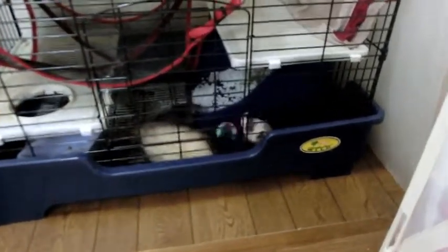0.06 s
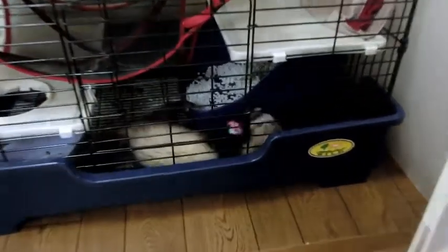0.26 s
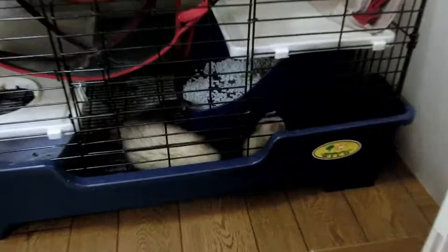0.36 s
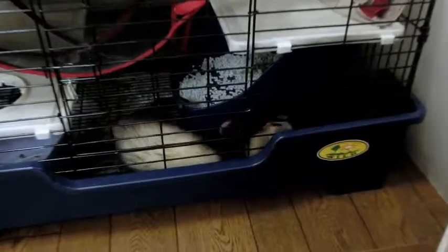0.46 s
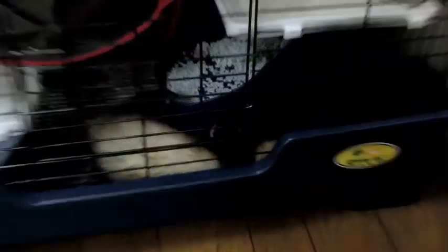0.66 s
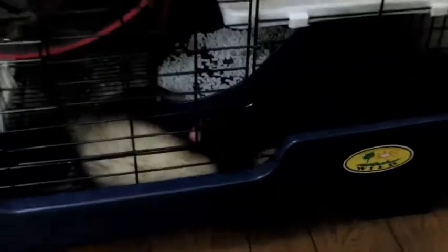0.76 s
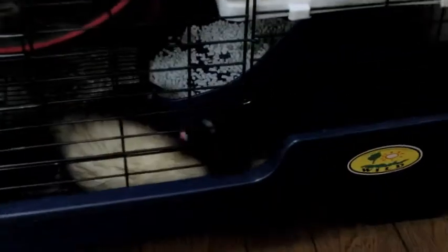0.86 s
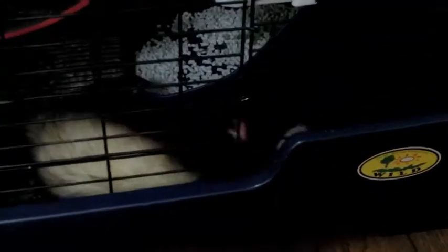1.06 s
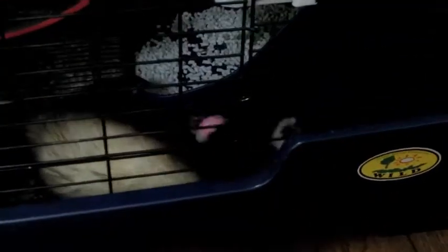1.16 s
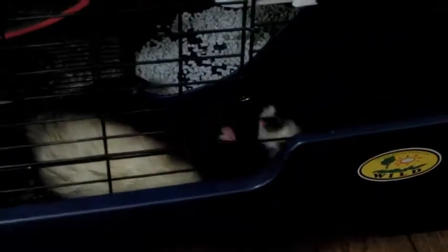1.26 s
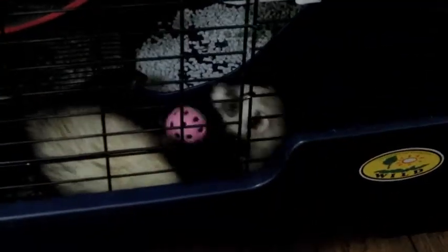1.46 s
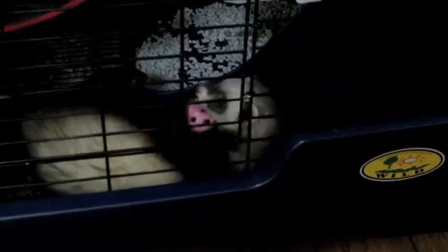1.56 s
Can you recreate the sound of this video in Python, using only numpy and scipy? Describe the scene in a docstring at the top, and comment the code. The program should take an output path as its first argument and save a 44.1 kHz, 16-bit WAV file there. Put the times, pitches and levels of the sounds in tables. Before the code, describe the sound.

A small bell jingles as a ferret shoves a ball around its cage, with one sharp knock.

```python
"""A small metal bell jingles on the right: a ferret shoves a ball about in a wire cage indoors.
The pellet inside strikes and rolls, ringing the bell; shell and paws scuff the plastic tray.
One sharp, dry knock right by the microphone overloads it.
The room is quiet, with a faint throbbing hum."""
import sys
import numpy as np
from scipy import signal
from scipy.fft import rfft, irfft, next_fast_len
from scipy.io import wavfile

SR = 44100
rng = np.random.default_rng(int(sys.argv[2]) if len(sys.argv) > 2 else 0)


def dump(signal):
    """Clip the signal to [-1, 1] and save it as 16-bit WAV at the path in sys.argv[1]."""
    limited = np.clip(np.atleast_2d(signal).T, -1, 1)
    pcm = np.round(limited * 32767).astype(np.int16)
    wavfile.write(sys.argv[1], SR, pcm)


N = 70560

# pellet strikes (time [s], level [dB])
STRIKES = [(.002, -28), (0.029, -32), (0.084, -40.5), (.115, -23), (0.132, -36), (.157, -35), (.207, -30.5),
           (0.215, -34.5), (.232, -22), (.252, -33.5), (.312, -33.5), (.321, -23.5), (.333, -35),
           (.403, -24.5), (0.436, -26.5), (0.495, -38.5), (.559, -25), (.566, -27.5), (0.614, -29.5),
           (.622, -25), (0.73, -31.5), (.919, -44), (.942, -44.5), (.988, -40.5), (.998, -37.5),
           (1.065, -30), (1.093, -34.5), (1.106, -30.5), (1.133, -38), (1.166, -38), (1.181, -36),
           (1.215, -30.5), (1.222, -27), (1.247, -39), (1.32, -39), (1.384, -34.5), (1.427, -38),
           (1.435, -36), (1.445, -38.5), (1.458, -33.5), (1.525, -33), (1.566, -33), (1.576, -35.5)]
# pellet rolling (time [s], level [dB])
ROLLING = [(0, -37), (.07, -42.5), (.3, -42), (.44, -39.5), (.6, -40), (.69, -41), (.77, -87.5),
           (.9, -60.5), (.97, -60.5), (1.01, -43), (1.055, -66.5), (1.087, -46), (1.115, -41.5), (1.2, -55),
           (1.25, -43), (1.35, -47.5), (1.415, -55.5), (1.455, -45), (1.515, -49), (1.6, -59)]
# bell modes (frequency [Hz], gain [dB])
BELL_MODES = [(7010, -2.5), (7590, 5), (7680, 4), (7950, -0.5), (9000, 0.5), (9250, 3.5), (10130, -3.5),
              (10490, 1.5), (11240, 0.5), (11600, -6.5), (12400, -8), (14300, 0.5)]
# pellet click in the bell's metal shell (frequency [Hz], gain [dB])
CLICK_SPECTRUM = [(200, -32.5), (1200, -23), (3000, -17), (5000, -13.5), (6500, -5), (7600, -0.5),
                  (8400, 1), (10500, 3), (13500, 4.5), (15400, -8.5)]


def jingle():
    """Each pellet contact cracks, chatters in the shell and rings a new mix of the bell's modes."""
    median_ticks_per_s, tick_db, tick_spread_db = 240, -4, 3
    ring_db, mode_spread_db, detune = -14.5, 4, .003
    t = np.arange(SR // 10) / SR
    hz, mode_db = np.transpose(BELL_MODES)
    decays = fade(t, t60_s=.13 * (hz[0] / hz[:, None]) ** 1.5)  # high modes die sooner
    crack = amp(7.5) * fade(t, t60_s=.014)
    chatter = amp(-7.5) * fade(t, t60_s=.038)
    click = (crack + chatter) * rise(t, tau_s=.001)
    gap_draw, level_draw = rng.standard_normal((1500, 2)).T
    ticks_s = np.cumsum(np.exp(gap_draw / 2)) / median_ticks_per_s
    ticks_db = np.interp(ticks_s, *np.transpose(ROLLING)) + tick_db + tick_spread_db * level_draw
    ticks = np.column_stack([ticks_s, ticks_db])[ticks_s < N / SR]
    mode_draws = rng.standard_normal((2000, 3, len(hz)))
    ring, click_power = np.zeros(N), np.zeros(N)
    for (start_s, db), (size, polarity, shift) in zip([*STRIKES, *ticks], mode_draws):
        detuned_hz = hz * (1 + detune * shift * hz / hz[0])
        modes = np.sin(2 * np.pi * np.outer(detuned_hz, t)) * decays
        gains = amp(db + mode_db + mode_spread_db * size) * np.sign(polarity)
        add(ring, start_s, gains @ modes)
        add(click_power, start_s, (amp(db) * click) ** 2)
    return amp(ring_db) * ring + np.sqrt(click_power) * noise(CLICK_SPECTRUM, shared=.33)


def cage_reverb(dry):
    """Short tail of the cage's corner, redrawn every 25 ms as the ball moves."""
    wet_db, predelay_s, block = -6, .002, SR // 40
    t = np.arange(SR // 5) / SR
    wet = np.zeros((2, N))
    for i in range(0, N, block):
        tail = rng.standard_normal((2, len(t))) * fade(t, t60_s=.17) * (t > predelay_s)
        tail /= np.linalg.norm(tail[0])
        add(wet, i / SR, signal.fftconvolve(dry[:, i:i + block], tail, axes=1))
    return dry + amp(wet_db) * wet


# response of the far, left port (frequency [Hz], gain [dB])
LEFT_SHADOW = [(300, -14), (5000, 3), (7200, -3), (9000, -9), (11000, -23.5), (13000, -36), (15500, -88)]


def from_right(stereo, lag_s=4e-5):
    """The ball lies to the right: the left port hears it later, with less treble."""
    left, right = stereo
    left = filtered(left, lambda hz: gain_at(LEFT_SHADOW, hz) * np.exp(-2j * np.pi * hz * lag_s))
    return np.array([left, right])


# a light tap, three grazes, the blow (time [s], level [dB], contact time [s])
KNOCKS = [(0.6356, -31, .0001), (0.7041, -19.5, 0.00016), (0.7054, -18, 0.00018), (0.7071, -21.5, .0001),
          (0.7082, 5.5, 0.000033)]
# plastic modes (frequency [Hz], left gain [dB], right gain [dB], t60 [s])
KNOCK_MODES = [(467, -12.5, -41, 0.0078), (1365, -12.5, -21, 0.012), (1612, -17.5, -47, 0.019),
               (2180, -26, -20, 0.012), (2558, -15, -59, 0.023), (3280, 1, -29, 0.0059),
               (3556, -5.5, -9, 0.0093), (3977, -18, -0.5, 0.0058), (4326, -4.5, -4, 0.0051),
               (6080, 1, -18.5, 0.0061), (8200, -11, -23.5, 0.0025)]
# snap of the blow (frequency [Hz], gain [dB])
SNAP_SPECTRUM = [(40, 0.5), (300, -2.5), (900, -21.5), (2000, -6), (4000, -18), (8000, 6.5), (14000, 0)]


def knock():
    """Hard plastic struck too near for any room sound: a snap and quickly damped modes."""
    snap_db, snap_rise_s, snap_t60_s = -2.5, .0027, .0056
    t = np.arange(SR // 20) / SR
    ring = sum(amp([[left_db], [right_db]]) * np.cos(2 * np.pi * hz * t) * fade(t, t60_s)
               for hz, left_db, right_db, t60_s in KNOCK_MODES)
    out = np.zeros((2, N))
    for start_s, db, contact_s in KNOCKS:
        force = np.exp(-t / contact_s)  # longer contact, duller knock
        add(out, start_s, amp(db) * signal.fftconvolve(ring, force[None] / force.sum(), axes=1))
    since_blow_s = np.arange(N) / SR - KNOCKS[-1][0]
    snap = fade(abs(since_blow_s), np.where(since_blow_s < 0, snap_rise_s, snap_t60_s))
    return out + amp(snap_db) * snap * noise(SNAP_SPECTRUM, shared=.28)


# ball and paws on the tray (time [s], level [dB], t60 [s], centre [Hz])
SCUFFS = [(.522, -38, 0.14, 970), (.558, -37, 0.2, 730), (.632, -38, 0.0626, 1970),
          (.665, -38, 0.084, 2400), (.669, -34.5, 0.059, 850), (.827, -44, 0.059, 710),
          (.864, -51, 0.027, 3520), (.894, -50.5, .03, 3180), (.997, -44, 0.12, 780),
          (1.019, -42.5, 0.058, 750), (1.092, -47, 0.11, 1840), (1.483, -52, .075, 443)]
# tray scuff, peak at 750 Hz (frequency [Hz], gain [dB])
TRAY_SPECTRUM = [(60, -30), (200, -14), (400, 3), (750, 7), (1250, 4), (1800, -5), (2800, -5.5),
                 (4500, -14.5), (12000, -27)]


def scuffs():
    """Short rubs on the plastic tray, from dull pads to bright claws."""
    t = np.arange(SR // 4) / SR
    out = np.zeros((2, N))
    for start_s, db, t60_s, centre_hz in SCUFFS:
        spectrum = np.array(TRAY_SPECTRUM) * [centre_hz / 750, 1]
        friction = noise(spectrum, shared=.6)[:, :len(t)]
        add(out, start_s, amp(db) * rise(t, tau_s=.00091) * fade(t, t60_s) * friction)
    return out


# shell brushing the tray (frequency [Hz], gain [dB])
BRUSH_SPECTRUM = [(300, -11), (3200, -0.5), (7000, -2), (12000, -8.5)]


def shell_brush(gain_db=-5, db_per_strike_db=1.332):
    """The shell brushes the tray at each strike, far more at hard shoves."""
    t = np.arange(SR // 10) / SR
    stroke = rise(t, tau_s=.003) * fade(t, t60_s=.063)
    power = np.zeros(N)
    for start_s, db in STRIKES:
        add(power, start_s, (amp(db_per_strike_db * db + gain_db) * stroke) ** 2)
    return np.sqrt(power) * noise(BRUSH_SPECTRUM, shared=.47)


# shell dragging on the tray (frequency [Hz], gain [dB])
DRAG_SPECTRUM = [(100, -8.5), (450, -1), (3000, -4.5), (12000, -7)]


def shell_drag(gain_db=-10):
    """The shell rubs softly over the tray while the pellet rolls."""
    rolling_db = np.interp(np.arange(N) / SR, *np.transpose(ROLLING))
    return amp(rolling_db + gain_db) * noise(DRAG_SPECTRUM, shared=.55)


# room noise (frequency [Hz], gain [dB])
AIR_SPECTRUM = [(25, 4.5), (300, -3.5), (600, 5), (900, 0), (2000, -6), (9000, -6.5), (13500, -34)]


def room_tone():
    """Soft room noise and an evenly throbbing, slowly fading hum, both slightly left."""
    hum_hz, hum_db, fade_db_per_s = 598, -62, 5
    throb_hz, throb_peak_s, throb_depth = 8.48, .035, .7
    t = np.arange(N) / SR
    throb = 1 + throb_depth * np.cos(2 * np.pi * throb_hz * (t - throb_peak_s))
    hum = amp(hum_db - fade_db_per_s * t) * unit_rms(throb * np.sin(2 * np.pi * hum_hz * t))
    air = amp(-60) * noise(AIR_SPECTRUM, shared=.7)
    return (air + hum) * amp([[1], [-1]])


def amp(db):
    """Decibels to gain."""
    return 10 ** (np.asarray(db) / 20)


def unit_rms(x):
    """Scales to rms 1."""
    return x / np.sqrt(np.mean(x ** 2) + 1e-20)


def gain_at(spectrum, hz):
    """Linear gain of a dB spectrum, interpolated in log frequency."""
    points_hz, db = np.transpose(spectrum)
    return amp(np.interp(np.log(hz + 1), np.log(points_hz + 1), db))


def rise(t, tau_s):
    """Exponential attack."""
    return 1 - np.exp(-t / tau_s)


def fade(t, t60_s):
    """Falls 60 dB in t60_s."""
    return np.exp(-np.log(1000) * t / t60_s)


def filtered(x, response):
    """Applies response(hz) by FFT."""
    n = x.shape[-1]
    padded = next_fast_len(n + SR // 10)
    hz = np.fft.rfftfreq(padded, 1 / SR)
    return irfft(rfft(x, padded) * response(hz), padded)[..., :n]


def noise(spectrum, shared):
    """Coloured stereo noise, rms 1; shared is the power fraction common to both sides."""
    left, right, both = rng.standard_normal((3, N))
    pair = np.sqrt(1 - shared) * np.array([left, right]) + np.sqrt(shared) * both
    return unit_rms(filtered(pair, lambda hz: gain_at(spectrum, hz)))


def add(track, start_s, sound):
    """Mixes sound into track from start_s."""
    part = track[..., round(start_s * SR):][..., :sound.shape[-1]]
    part += sound[..., :part.shape[-1]]


def scene():
    """All sources at the two microphone ports."""
    ball = from_right(cage_reverb(jingle()))
    return ball + shell_drag() + shell_brush() + scuffs() + knock() + room_tone()


def record(dry):
    """The microphone soft-clips the knock, thins the bass and cuts the top treble."""
    ceiling, low_cut_hz, top_hz = .95, 105, 15800
    clipped = dry / (1 + (dry / ceiling) ** 8) ** (1 / 8)
    return filtered(clipped, lambda hz: 1j * hz / (low_cut_hz + 1j * hz) * (hz < top_hz))


dry = scene()
out = record(dry)
dump(out)
```